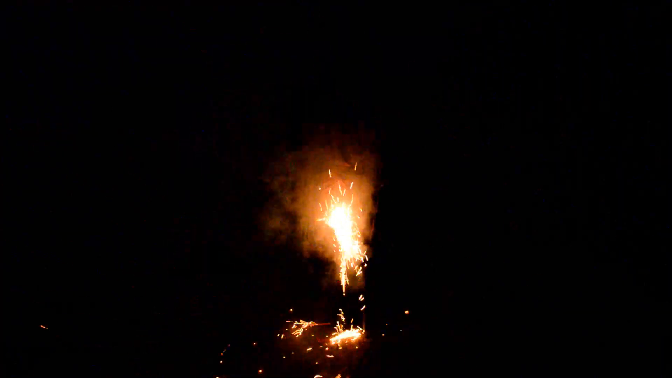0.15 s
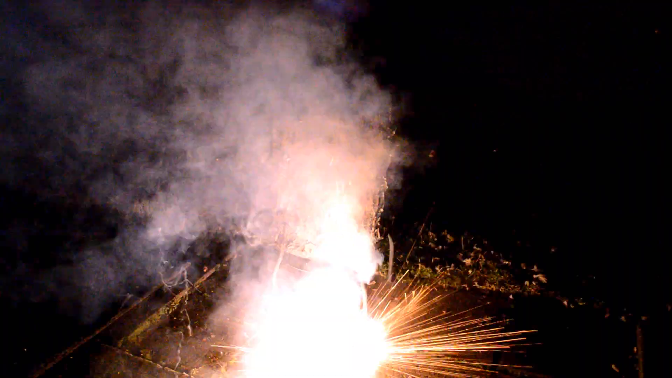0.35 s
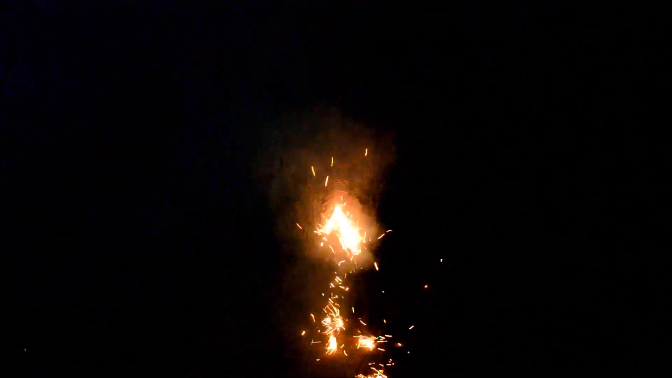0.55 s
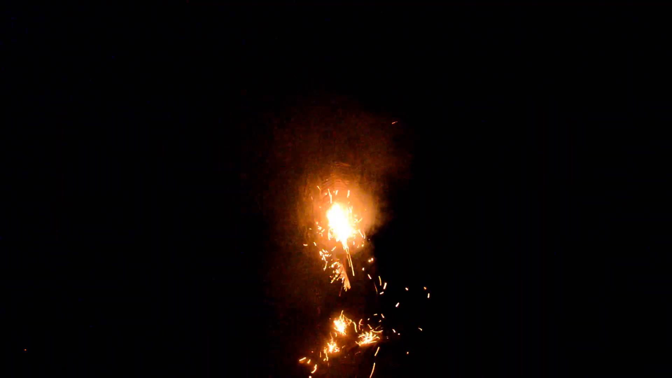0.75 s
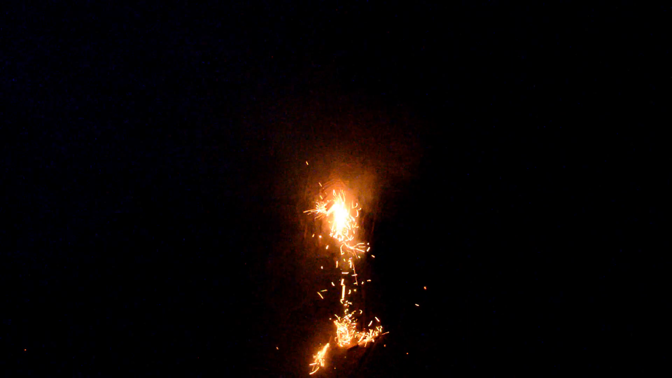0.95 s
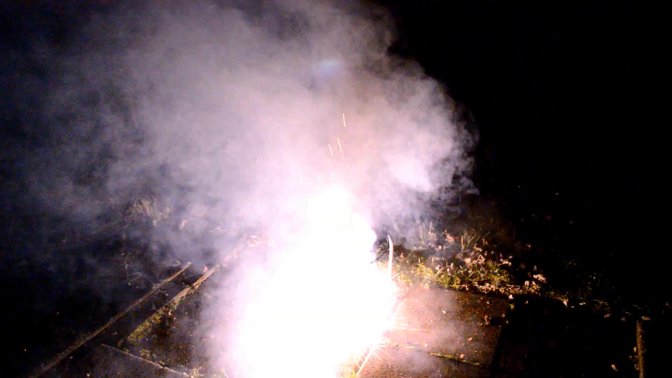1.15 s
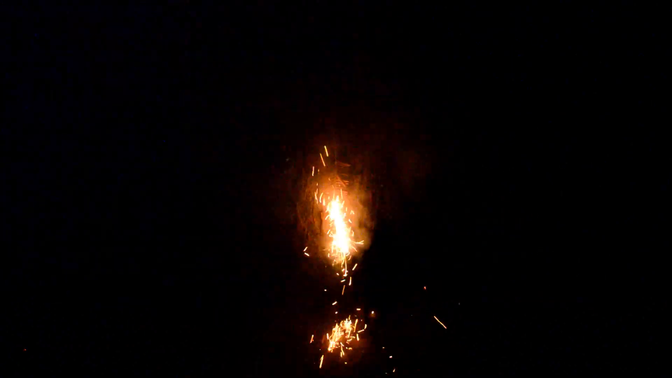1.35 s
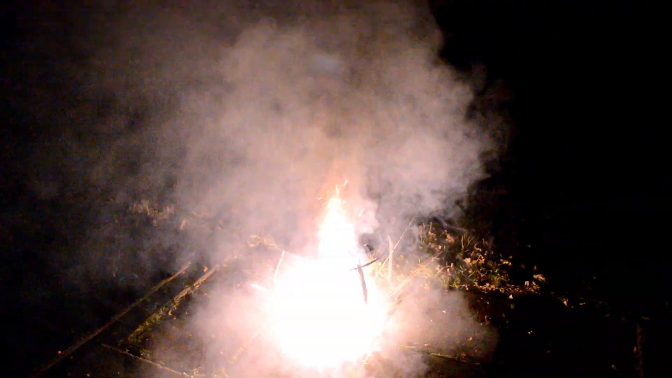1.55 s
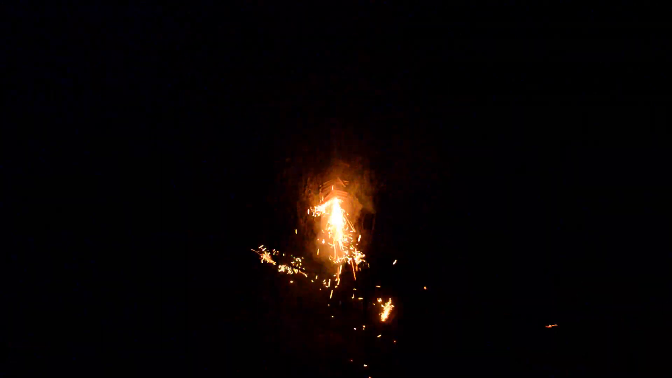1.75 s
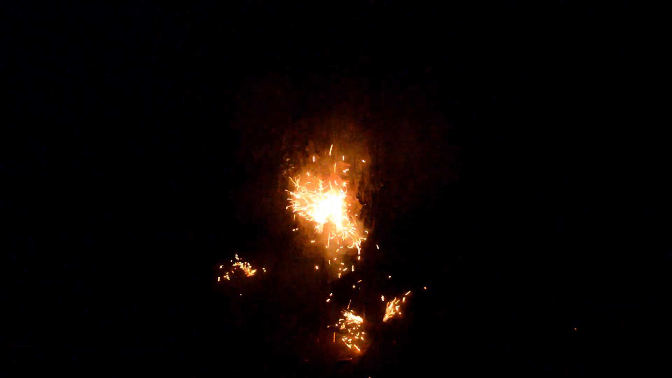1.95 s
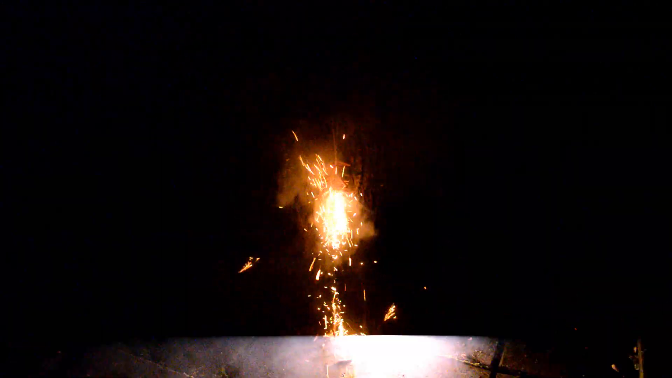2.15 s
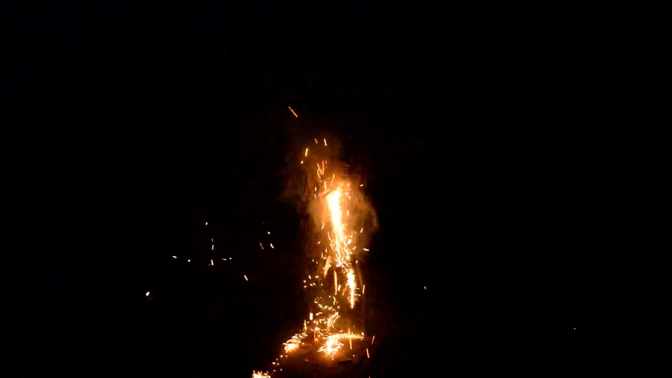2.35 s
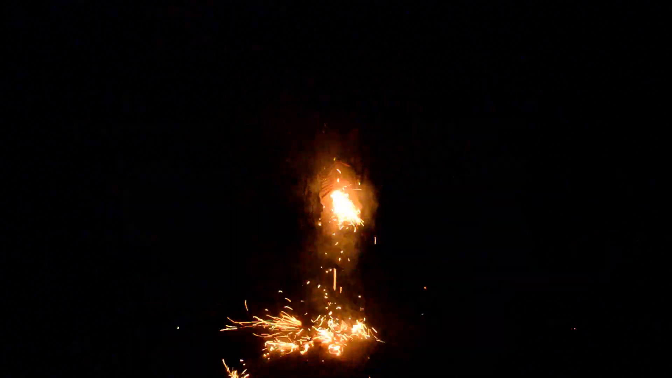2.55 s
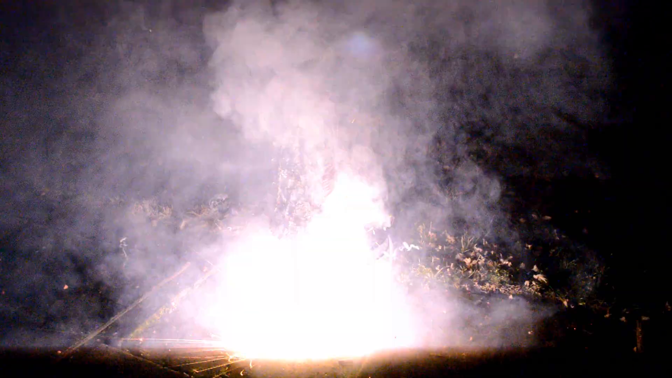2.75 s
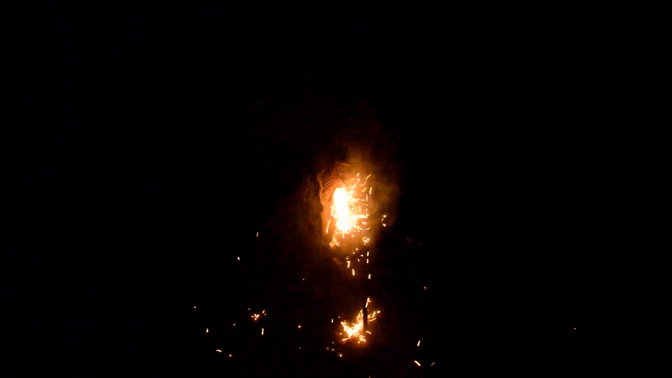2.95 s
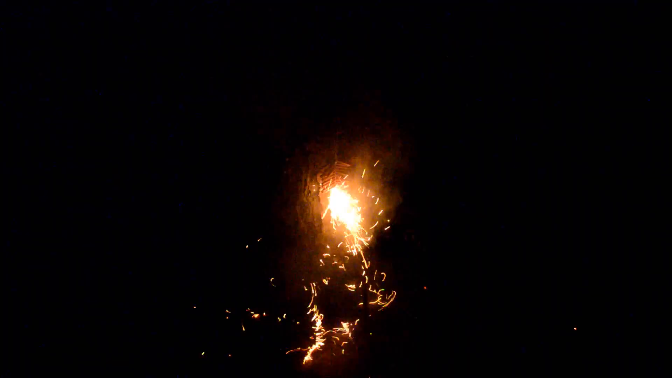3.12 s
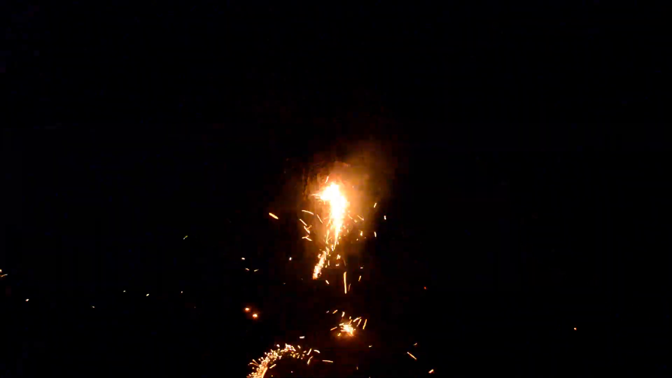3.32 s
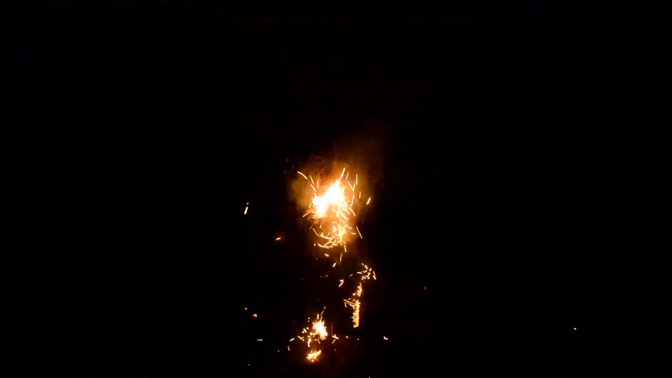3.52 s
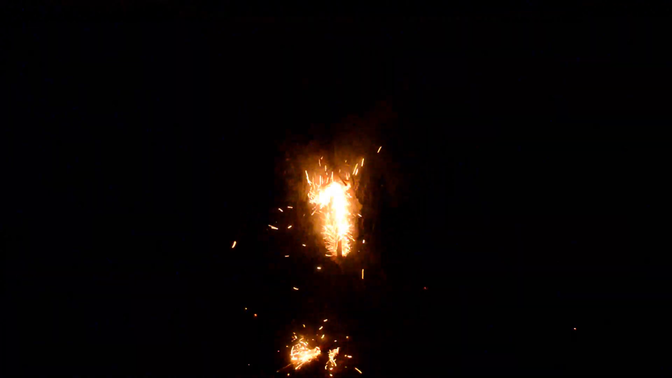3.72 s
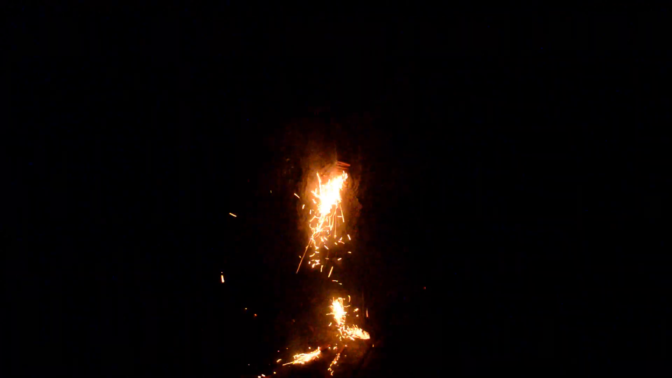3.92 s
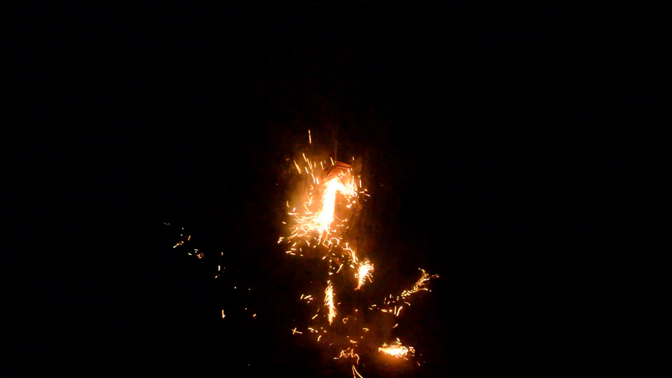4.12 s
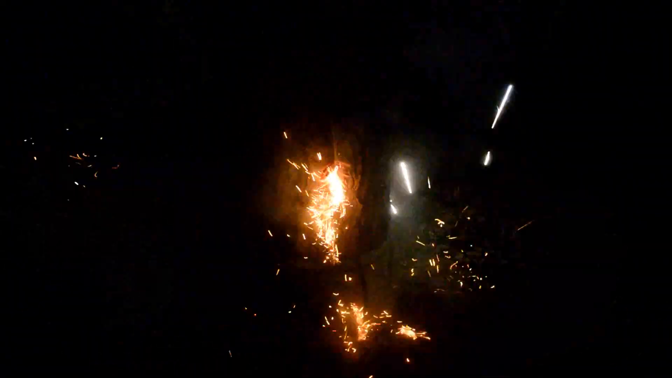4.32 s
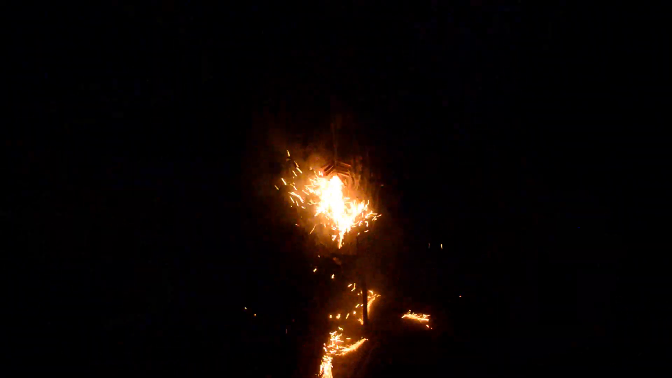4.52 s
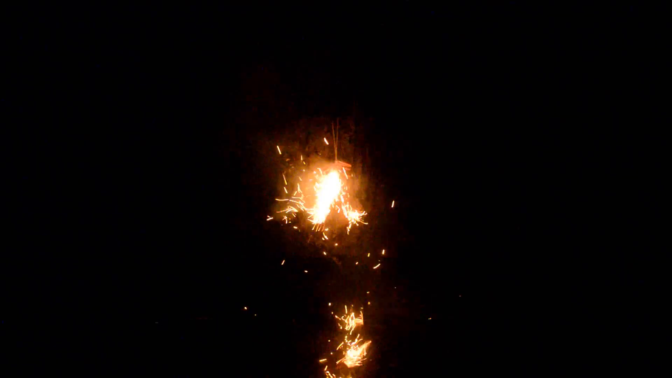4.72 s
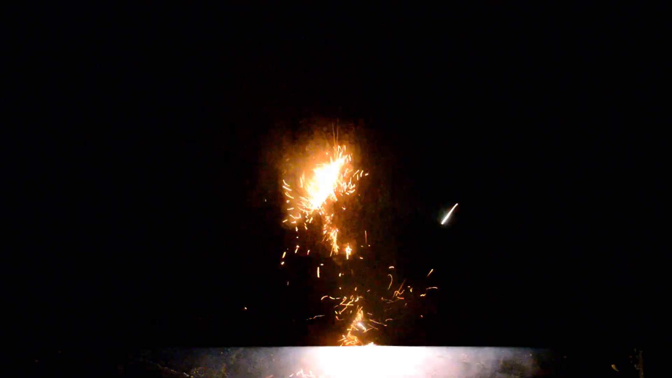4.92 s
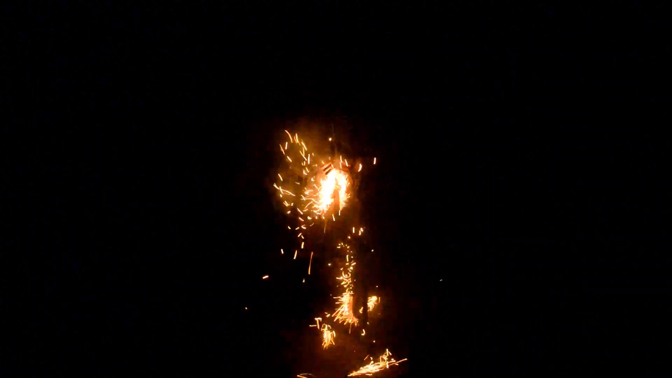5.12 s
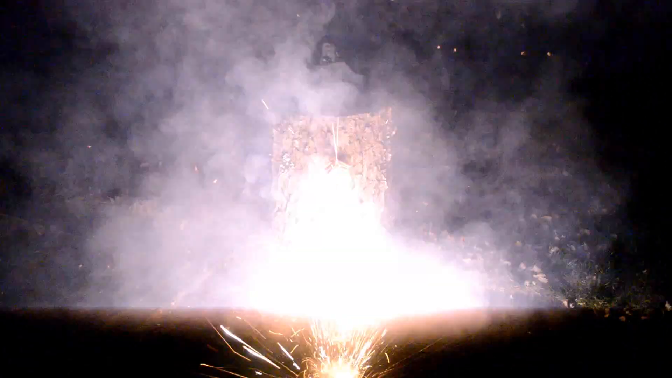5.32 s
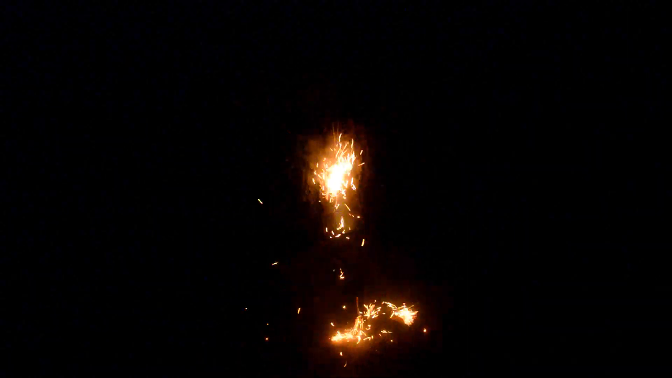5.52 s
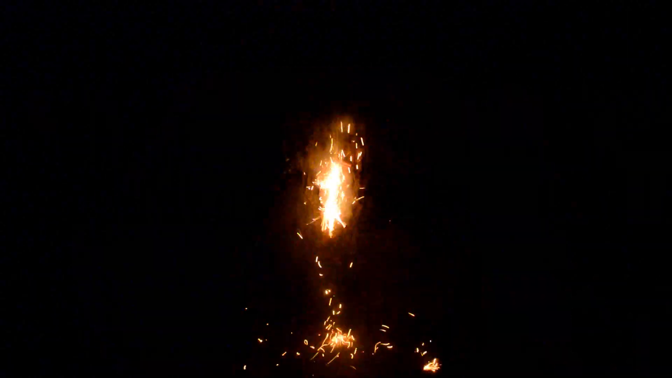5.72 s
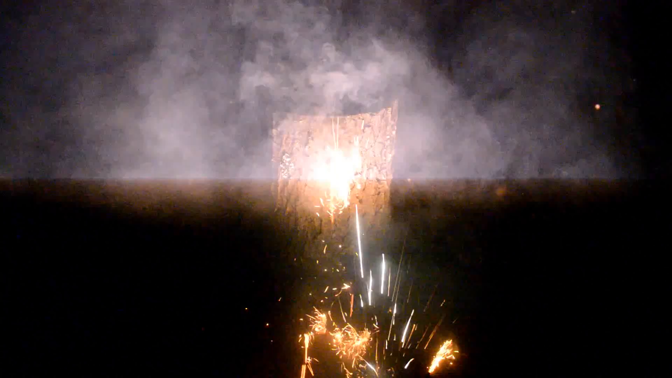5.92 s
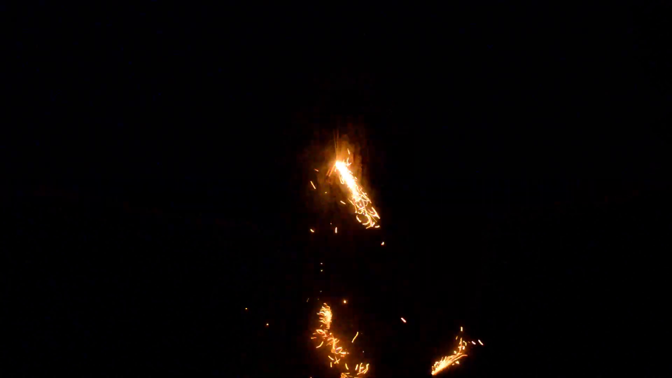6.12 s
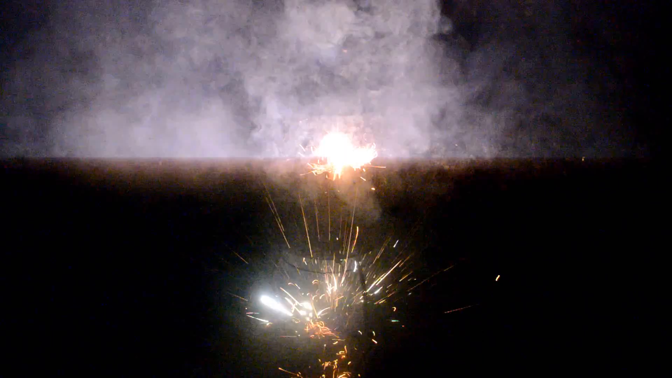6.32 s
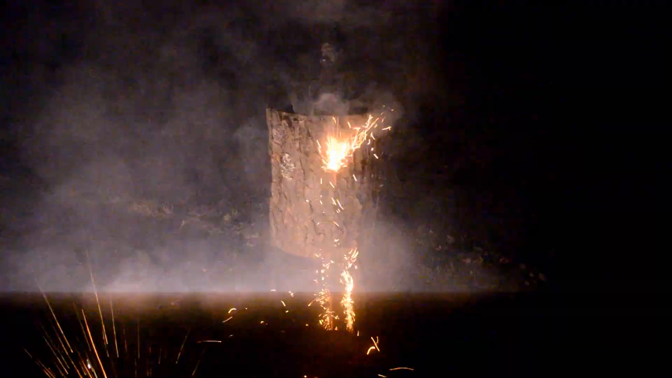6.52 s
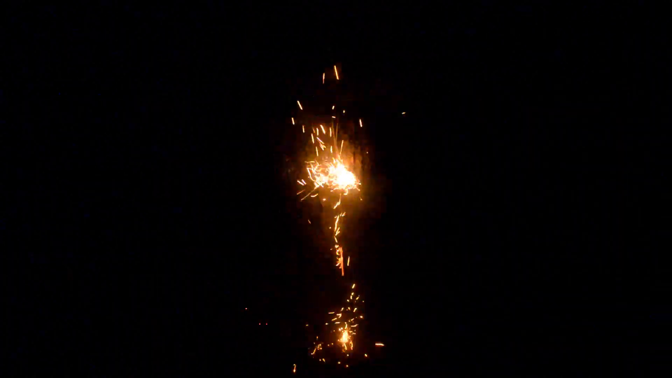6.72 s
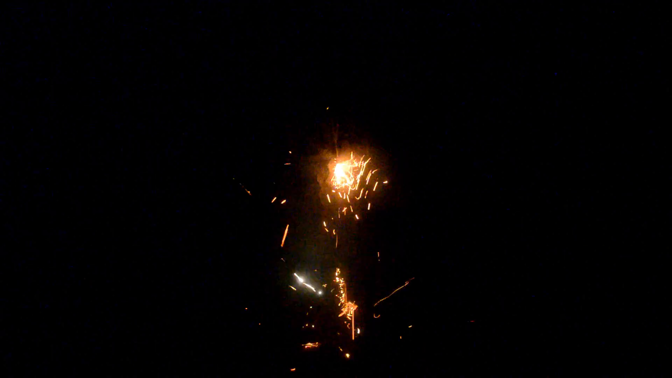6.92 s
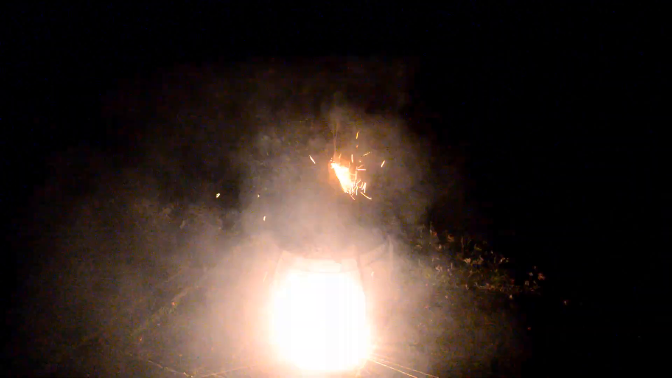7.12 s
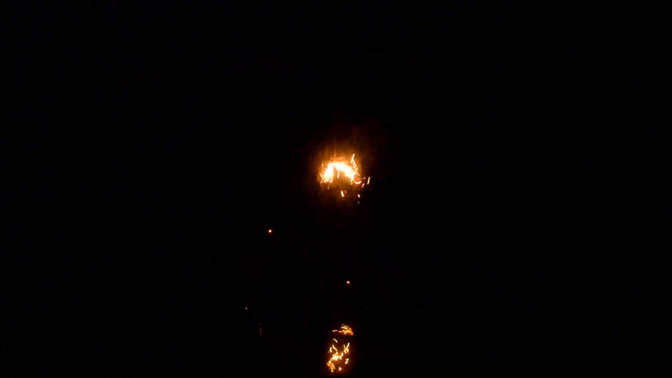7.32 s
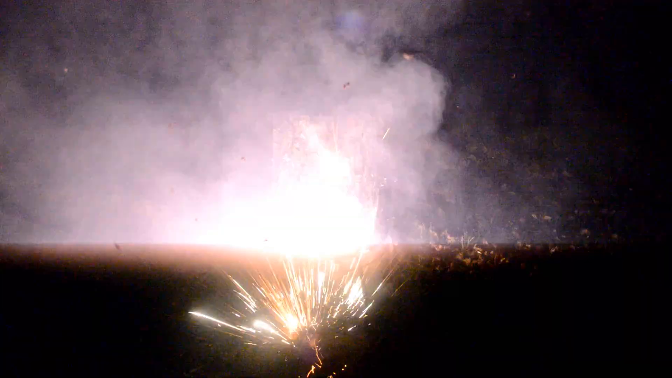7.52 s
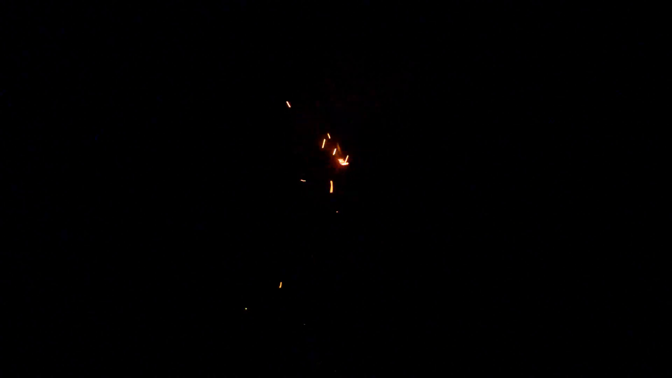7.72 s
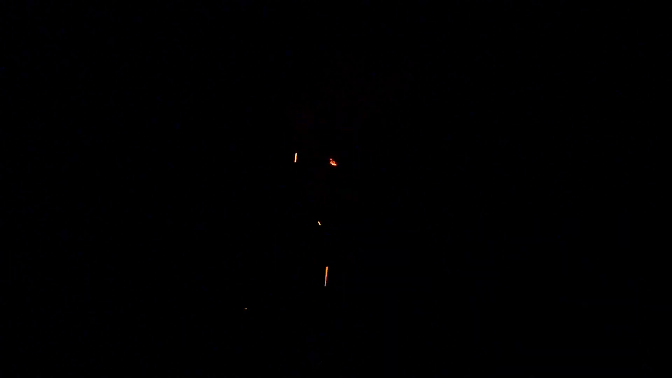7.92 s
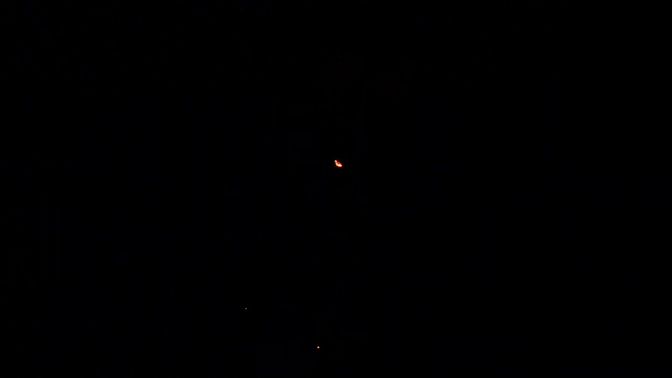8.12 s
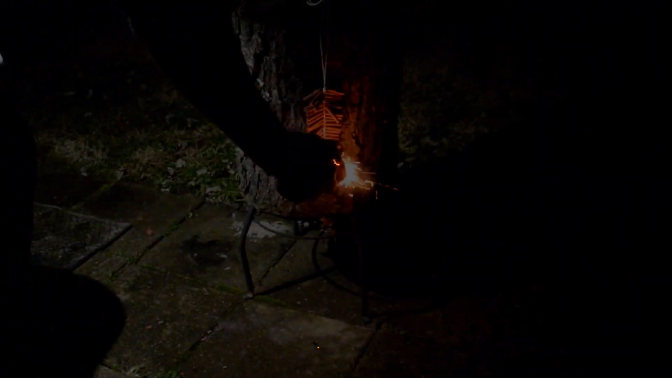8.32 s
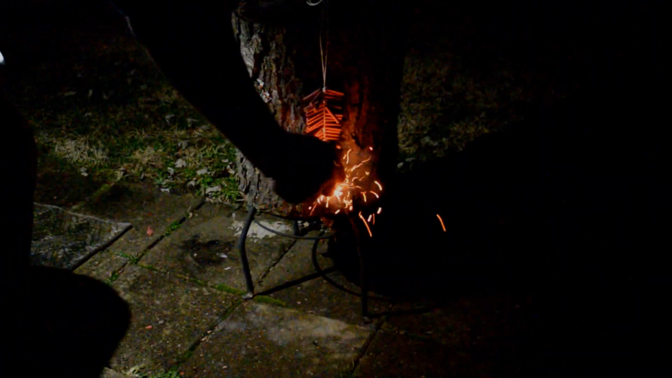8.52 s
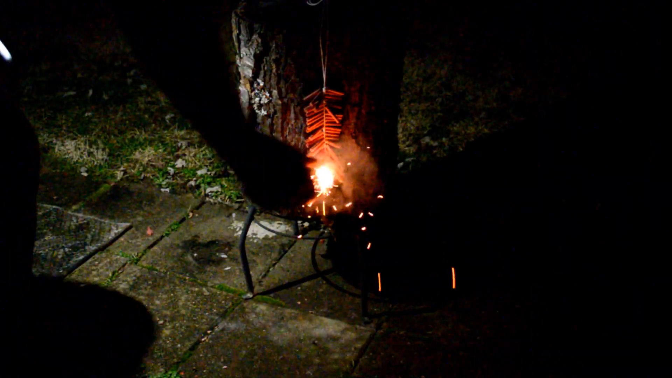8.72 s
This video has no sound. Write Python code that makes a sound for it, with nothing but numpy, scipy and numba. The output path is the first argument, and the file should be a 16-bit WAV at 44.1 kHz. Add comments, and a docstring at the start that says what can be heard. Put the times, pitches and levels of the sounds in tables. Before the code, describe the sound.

A hanging string of firecrackers bangs sharply and irregularly in a paved yard, fuses hissing between, before a fresh fuse sputters close by.

```python
"""A paved yard at night, where a string of firecrackers hangs from a tree. Each cracker is a spike with a low thump,
then noise and single echoes off paving, walls and far houses, loud enough to clip. Gain control lifts the echoes
into a wash, with fuses hissing in the gaps as coloured noise. At the end the wash fades away while a fresh fuse,
noise with lifted bands, fades in close by among a few short snaps."""
import sys
import numpy as np
from scipy import signal
from scipy.fft import rfft, irfft, next_fast_len
from scipy.io import wavfile
from scipy.ndimage import uniform_filter1d
from numba import njit

SR = 44100
rng = np.random.default_rng(int(sys.argv[2]) if len(sys.argv) > 2 else 0)


def transcribe(u):
    """Save the signal u as a 16-bit wav file named by the first command-line argument.

    u: samples, shape (n,) or (channels, n), limited to [-1, 1]; the rate is SR.
    q: integer samples, one column per channel.
    """
    v = np.clip(np.atleast_2d(u).T, -1, 1)
    q = np.round(v * 32767).astype(np.int16)
    wavfile.write(sys.argv[1], SR, q)


def gain_from_decibels(decibels):
    """Convert decibel values to linear amplitude factors."""
    exponent = np.asarray(decibels, float) / 20
    return 10 ** exponent


N = 390726
LEAD = SR // 2  # samples of run-up, so that a bang before the start can leave its echoes


def colour(x, table):
    """Causal minimum-phase filter, made by folding the cepstrum of a (frequency [Hz], gain [dB]) curve."""
    hz, db = np.transpose(table)
    grid_hz = np.linspace(1, SR / 2, 2049)
    log_gain = np.interp(np.log(grid_hz), np.log(hz), db) * np.log(10) / 20
    cepstrum = irfft(log_gain)
    cepstrum[1:2048] *= 2
    cepstrum[2049:] = 0
    impulse = irfft(np.exp(rfft(cepstrum)))
    return signal.fftconvolve(x, impulse)[:len(x)]


def ramps(count, k):
    """Smooth random walk between levels drawn every k samples."""
    levels = np.repeat(rng.standard_normal(count // k + 1), k)[:count]
    return uniform_filter1d(levels, k)


def decaying(x, seconds):
    """Gives every impulse an exponential tail that falls to 1/e in the given time."""
    return signal.lfilter([1], [1, -np.exp(-1 / (seconds * SR))], x)


def hiss(table, flicker_db, rate):
    """Coloured noise of rms 1 whose level flickers, with new random levels at the given rate [per s]."""
    flicker = gain_from_decibels(flicker_db * ramps(N, int(SR / rate)))
    x = colour(rng.standard_normal(N) * flicker, table)
    return x / x.std()


def swells(rows, t):
    """Gain of rise-and-fall shapes, straight in dB, whose powers add up."""
    power = 0
    for s, db, rise, fall in rows:
        drop_db = np.where(t < s, abs(rise) * (s - t), abs(fall) * (t - s))
        power = power + gain_from_decibels(db - drop_db) ** 2
    return np.sqrt(power)


def glinting(count):
    """Gain of single faces that glint briefly out of the scatter."""
    per_s, decay_s, most_db = 80, .001, 9  # most_db: greatest lift of one glint
    glints = (rng.random(count) < per_s / SR) * rng.random(count) * most_db
    return gain_from_decibels(decaying(glints, decay_s))


def scatter(starts, strengths_db):
    """Powers of all bangs add up band by band, the air eating the treble; fresh noise carries them."""
    # swells after a bang, before the losses below: (peak delay [s], level [dB], rise [dB/s], fall [dB/s])
    paving_and_trunk = [(0, -.5, 0, 1103), (.016, -9.5, 60, 896)]
    far_houses = [(0.043, -25.5, 300, 119), (.47, -64, 44, 40), (.62, -59.5, 23, 34.3)]
    wall_swell = [(0.102, -30, 5000, 150), (.15, -40, 101, 170)]
    air_db_per_s, air_power = 4.5, 1.28  # loss at 1 kHz, and how steeply it grows with frequency
    bass_db_per_s = 18.5  # extra loss for every octave below about 660 Hz
    lump_db, lumps_per_s = 1.6, 45  # the scatter rolls unevenly, band by band
    step = 8  # samples per point of the power curves

    count = N + LEAD
    trains = np.zeros((len(strengths_db), count // step + 1))
    trains[:, starts // step] = gain_from_decibels(strengths_db) ** 2
    t = np.arange(0, 1.5, step / SR)
    shapes = np.array([swells(rows, t) for rows in (paving_and_trunk, far_houses, wall_swell)])
    size = next_fast_len(count, True)
    noise = rfft(rng.standard_normal(size))
    octave = np.log2(np.maximum(np.fft.rfftfreq(size, 1 / SR), 1) / 1000)
    out = np.zeros(count)
    for o in np.arange(-3, 4.6, .5):  # octaves from 1 kHz
        loss = air_db_per_s * 2 ** (o * air_power) + bass_db_per_s * max(-o - .6, 0)
        tails = (shapes * gain_from_decibels(-loss * t)) ** 2
        power = signal.fftconvolve(trains, tails, axes=1).sum(axis=0)
        lumps = ramps(len(power), int(SR / step / lumps_per_s))
        power *= gain_from_decibels(lump_db * lumps) ** 2
        band = irfft(noise * np.clip(1 - 2 * abs(octave - o), 0, 1), size)
        out += band[:count] * np.repeat(np.sqrt(abs(power)), step)[:count]
    return out * glinting(count)


def reflection(starts, strength_db, delay, db, smear, top_hz):
    """A rough wall smears each shock into a short dull burst, a little different for every cracker's place."""
    chance = rng.standard_normal((len(starts), 2))
    arrivals = starts + (SR * (delay + .0006 * chance[:, 0])).astype(int)
    hits = np.zeros(N + LEAD + SR)
    hits[arrivals] = gain_from_decibels(strength_db + db + 2.5 * chance[:, 1])
    burst = decaying(hits[:N + LEAD], smear) * rng.standard_normal(N + LEAD)
    return signal.lfilter(*signal.butter(2, top_hz, fs=SR), burst)


def echoes(starts, strength_db, far_db):
    """Single reflections that get longer and duller by powers of their delay."""
    # (delay [s], level [dB])
    echo_rows = [(.0088, 1.5), (.015, -7), (.0185, -4.5), (0.024, -4), (0.031, -9), (.054, -29),
                 (0.069, -19), (0.09, -25.5), (.134, -34.5), (0.149, -29)]
    near_s = .04  # later ones come from far surfaces
    smear_s, smear_power = 0.00073, 0.4  # of the first echo, and how it lengthens
    top_hz, dull_power = 8500, 0.5  # of the first echo, and how it dulls
    out = np.zeros(N + LEAD)
    for delay, db in echo_rows:
        later = delay / echo_rows[0][0]
        sent_db = strength_db + far_db * (delay > near_s)
        out += reflection(starts, sent_db, delay, db, smear_s * later ** smear_power,
                          top_hz / later ** dull_power)
    return out


def wall_slap(starts, strength_db, wall_db):
    """The flat face of the facing wall throws back one distinct slap."""
    # (level [dB], smear [s], top frequency [Hz])
    facing_wall = (-21, .0009, 11000)
    delay_s, share = .1082, 0.43  # share: dB of slap per dB of sound sent to the wall
    return reflection(starts, strength_db + share * wall_db, delay_s, *facing_wall)


def thump(starts, thump_db):
    """Each bang's ragged low push: decaying noise, coloured towards the bass."""
    # colour: (frequency [Hz], gain [dB])
    thump_colour = [(25, 8), (60, 16.5), (110, 21), (200, 21.5), (300, 15), (500, -1), (2000, -22)]
    push = np.zeros(N + LEAD)
    push[starts] = gain_from_decibels(thump_db)
    push = decaying(push, 0.0031) * rng.standard_normal(len(push))
    return colour(push, thump_colour)


def crackers():
    """Shock, scatter and echoes share one colour; a ragged low thump rides along."""
    # one bang a row: (time [s], strength [dB], thump [dB],
    # extra sent to the far houses [dB], extra sent to the facing wall [dB])
    bangs = [(-.25, 7.5, -20, 1.5, 0), (0.0084, 3, -12, 7, 0), (0.0815, -3, -17, 0, 0),
             (0.3164, 12.5, -12, 3.5, 6), (0.4746, 2.5, -15, -7, 20), (0.4913, 10, -13, 1.5, -12),
             (0.542, 12, -13, -10, -5), (0.8022, 7, -10, 7, 6), (1.2745, 0.5, -13, 3.5, 11),
             (1.3301, 3.5, -18, 5, 6), (1.6541, -10, -14.5, -10, 11), (1.673, 1.5, -9, 4.5, 8),
             (2.3015, -6.5, -17, 7.5, -4), (2.363, 6.5, -21, 6, 10), (2.6086, -1, -16, 5, 6),
             (2.7192, 8.5, -6.5, 4.5, 2), (2.8688, 2, -13, 4.5, 2.5), (3.199, 9.5, -10, 5, 7.5),
             (3.3514, 11, -5.5, 3, 8.5), (3.4779, 8.5, -7.5, 4, -1.5), (4.1722, 9.5, -5.5, 5, 6),
             (4.303, -2, -28, -5, 17), (4.3935, -4, -22, 0, 2), (4.405, 4, -13, 2.5, 0.5),
             (4.7758, -1, -16.5, 6.5, 14), (5.009, 1, -19, 5, 11), (5.072, 1.5, -17, -8, 2),
             (5.3006, 6.5, -9, 6, 2), (5.3441, 16.5, -1, 4.5, 6.5), (5.436, 10.5, -3.5, -2, -3.5),
             (5.72, -5.5, -27, 5, 10.5), (5.967, 6, -11.5, 6.5, 16), (6.028, 10, -6, -10, 1),
             (6.3226, 2, -15.5, 5.5, 8), (6.427, 9, -6.5, 6, -3), (6.598, -3.5, -17.5, 8.5, 7.5),
             (6.636, 2, -9.5, 2, -13), (7.005, 11.5, -6.5, 5, 10), (7.2529, -4.5, -21, 3, 4),
             (7.5547, 5.5, -7.5, 5, 16.5), (7.6346, 8.5, -9, 2.5, 4.5)]
    # shared colour: (frequency [Hz], gain [dB])
    blast_colour = [(40, -87), (100, -19.5), (300, -11), (600, -6.5), (1200, -1), (2500, -3), (5000, -8),
                    (7000, -7), (9000, -14), (14000, -20.5), (20000, -34.5)]
    shock_db = 13.5  # the first spike over the bang's strength
    s, db, thump_db, far_db, wall_db = np.transpose(bangs)
    starts = LEAD + (s * SR).astype(int)
    heard = scatter(starts, [db, db + far_db, db + wall_db])
    heard[starts] += gain_from_decibels(db + shock_db)
    heard += echoes(starts, db, far_db)
    heard += wall_slap(starts, db, wall_db)
    return (colour(heard, blast_colour) + thump(starts, thump_db))[LEAD:]


def fuses(t):
    """The string's fuses hiss steadily, flare now and then and die around the last cracker."""
    # colour: (frequency [Hz], gain [dB])
    fuse_colour = [(300, -26), (1000, -19), (3500, -1), (6500, 3), (9000, -1.5), (13000, -6), (18000, -67)]
    # fuses flaring up: (peak time [s], level [dB], rise [dB/s], fall [dB/s])
    flares = [(1.9, -82, 28, 30), (4.15, -64.5, 24, 49), (7.0, -81, 15, 20)]
    steady_db, out_s, dying_db_per_s = -70.5, 7.6, 200  # level ahead of the gain control
    dying = gain_from_decibels(-dying_db_per_s * np.maximum(t - out_s, 0))
    level = np.hypot(gain_from_decibels(steady_db), swells(flares, t)) * dying
    return level * hiss(fuse_colour, 0.48, 37.0)


def night_air(flicker_db, rate):
    """The yard's low night bed: unsteady noise, strongest near 60 Hz."""
    # colour: (frequency [Hz], gain [dB])
    night_colour = [(25, -36), (50, -20), (59, -4), (69, -20), (150, -19.5), (220, -13), (400, -29),
                    (2000, -65), (16000, -47)]
    return hiss(night_colour, flicker_db, rate)


@njit
def follow(db, start_db, top_db, fall, rise):
    """The gain drops fast towards what is wanted and creeps back up at a steady rate."""
    out, g = np.empty(len(db)), start_db
    for i in range(len(db)):
        want = min(db[i], top_db)
        if want < g:
            g = g + fall * (want - g)
        else:
            g = min(g + rise, want)
        out[i] = g
    return out


def gain_control(x, aim_db, ratio, top_db, sense_s, fall_s, rise_db_per_s):
    """Level sensing, then a gain too slow to catch the first milliseconds of a bang."""
    a = np.exp(-1 / (sense_s * SR))
    level_db = 10 * np.log10(signal.lfilter([1 - a], [1, -a], x ** 2) + 1e-12)
    want_db = (aim_db - level_db) * (1 - 1 / ratio)
    start_db = 36.7
    gain_db = follow(want_db, start_db, 1. * top_db, 1 / (fall_s * SR), rise_db_per_s / SR)
    return x * gain_from_decibels(gain_db)


def sparks():
    """Small bright snaps of burning powder: band-passed, decaying noise, cubed to make it ragged."""
    # (time [s], peak [dB], centre frequency [Hz], decay [s])
    snaps = [(3.1158, -4, 7060, 0.0084), (8.2076, -25, 8500, 0.00194), (8.2164, -27, 8500, .002),
             (8.249, -33, 7500, .002), (8.2744, -27, 9500, .002), (8.6487, -8, 4500, 0.0018)]
    length = 1323  # samples, 30 ms
    out, t = np.zeros(N + length), np.arange(length) / SR
    for s, db, hz, decay in snaps:
        snap = rng.standard_normal(length) ** 3 * np.exp(-t / decay)
        edges_hz = [hz / 1.5, min(hz * 1.5, .45 * SR)]
        snap = signal.lfilter(*signal.butter(1, edges_hz, "band", fs=SR), snap)
        start = int(s * SR)
        out[start:start + length] += gain_from_decibels(db) * snap / abs(snap).max()
    return out[:N]


def fresh_fuse(t):
    """A sputtering jet whose bounces off paving and trunk lift some bands; it fades in steadily in dB, then holds."""
    # colour of the jet: (frequency [Hz], gain [dB])
    jet_colour = [(88, -54), (150, -27), (291, -4), (332, -10.5), (735, -0.5), (1070, -9.5), (2870, -3.5),
                  (6990, -6), (13800, -21)]
    # bands that stand out: (centre [Hz], width [Hz], lift [dB])
    lifted_bands = [(725, 450, 5), (1290, 47, 9.5), (2230, 110, 10), (2800, 190, 7), (3470, 100, 0),
                    (3850, 45, 6), (4470, 240, 4.5), (5800, 40, 12), (6800, 170, 3), (7800, 80, 8),
                    (8350, 130, 5.5), (9030, 190, 0), (10500, 180, 10), (12200, 310, 8)]
    fade_in_end_s, held_db, fade_in_db_per_s = 8.774, -29, 29  # held_db: the jet without its lifted bands
    jet = hiss(jet_colour, 1.6, 50)
    bands = np.zeros(N)
    for hz, width, db in lifted_bands:
        bands += (gain_from_decibels(db) - 1) * signal.lfilter(*signal.iirpeak(hz, hz / width, fs=SR), jet)
    fade_in = gain_from_decibels(held_db - fade_in_db_per_s * np.maximum(fade_in_end_s - t, 0))
    return fade_in * (jet + bands)


def scene():
    """The burning string through gain control, cross-fading into the fresh fuse and a bare night bed."""
    fade_s, fade_db_per_s = 8.205, 40.5
    t = np.arange(N) / SR
    string = crackers() + fuses(t) + gain_from_decibels(-87) * night_air(flicker_db=3.3, rate=3.6)
    string = gain_control(string, aim_db=-10.0, ratio=4.45, top_db=69, sense_s=0.016, fall_s=0.0023,
                          rise_db_per_s=139.5)
    fade = gain_from_decibels(-fade_db_per_s * np.maximum(t - fade_s, 0))
    night = (1 - fade) * gain_from_decibels(-50.5) * night_air(flicker_db=2.7, rate=5.2)
    return (fade * string + fresh_fuse(t) + night + sparks())[None]


def top_cut(x):
    """Nothing passes above the cut-off."""
    return signal.sosfilt(signal.butter(12, 13750, fs=SR, output="sos"), x)


def record(dry):
    """The converter clips flat, cuts the top steeply and clips what overshoots."""
    low_pass = signal.ellip(8, .1, 60, 15600, fs=SR, output="sos")  # 0.1 dB ripple, 60 dB down, edge in Hz
    clipped = np.clip(dry, -1, 1)
    mix = np.clip(signal.sosfilt(low_pass, clipped), -1, 1)
    return top_cut(mix)


dry = scene()
out = record(dry)
transcribe(out)
```